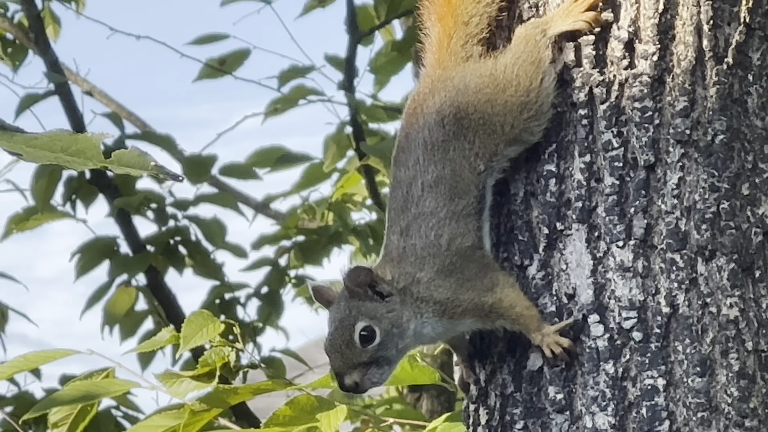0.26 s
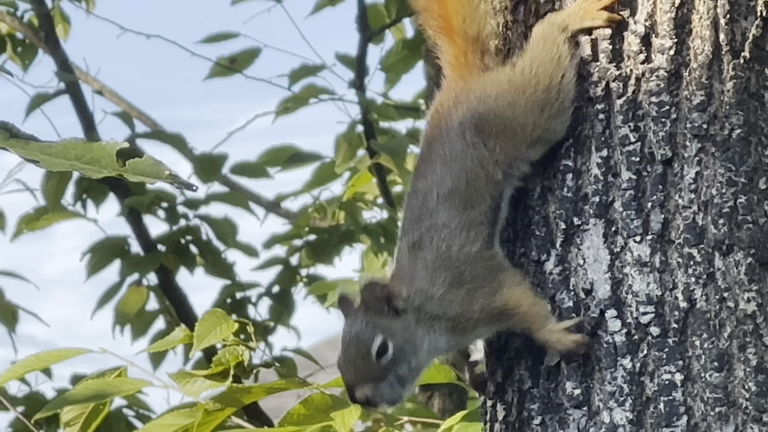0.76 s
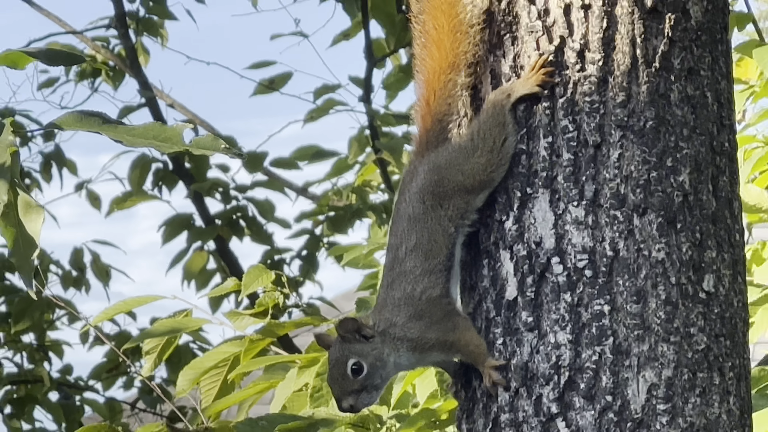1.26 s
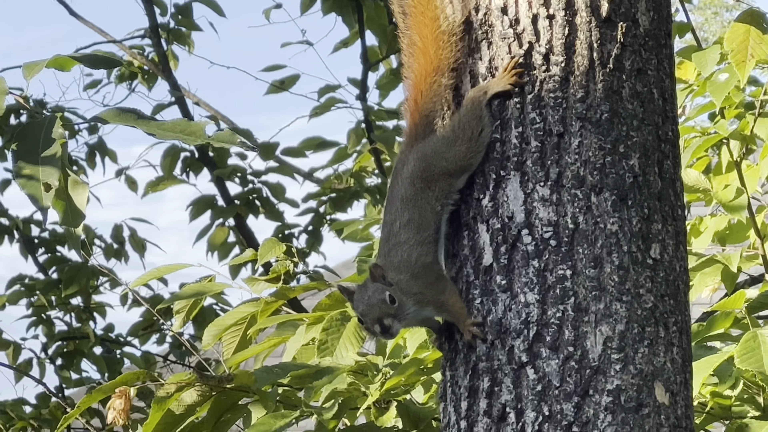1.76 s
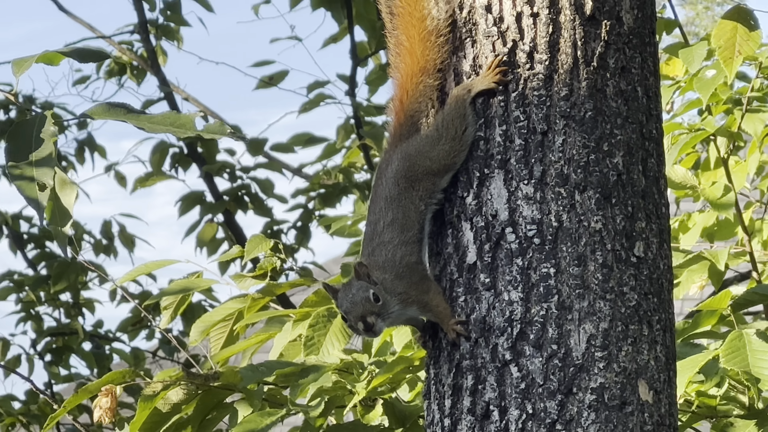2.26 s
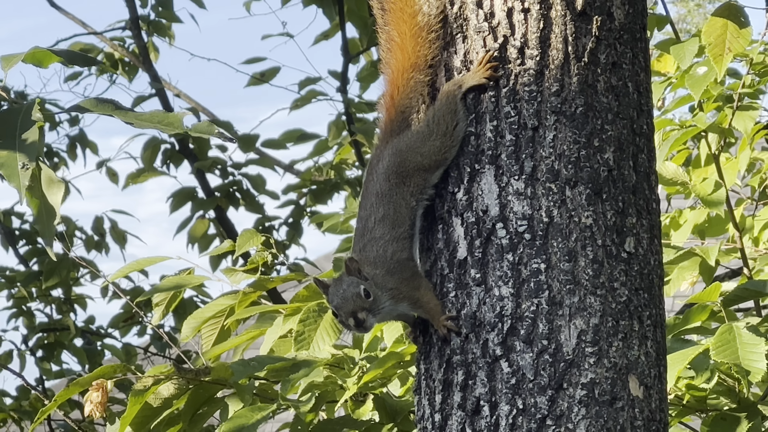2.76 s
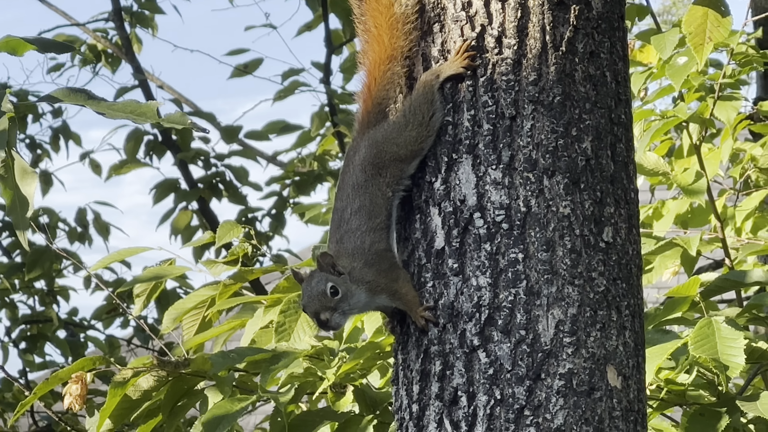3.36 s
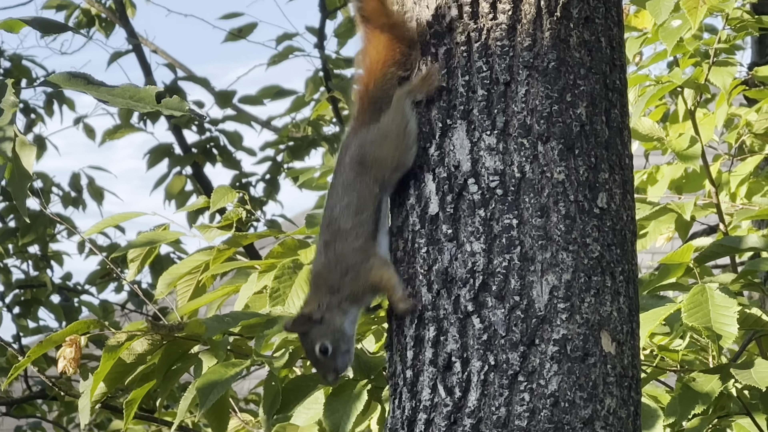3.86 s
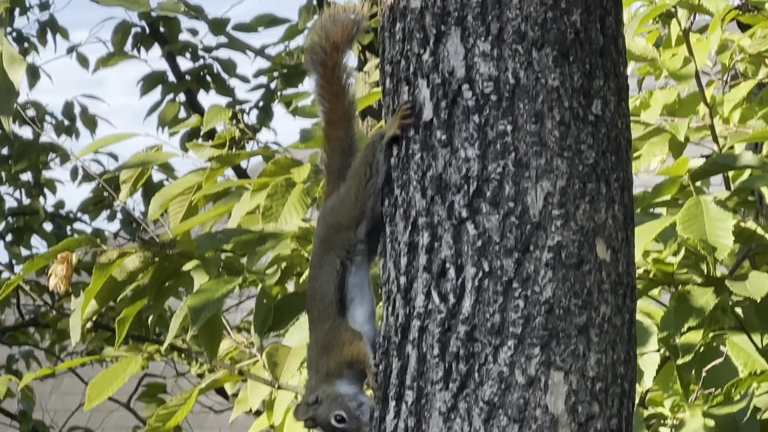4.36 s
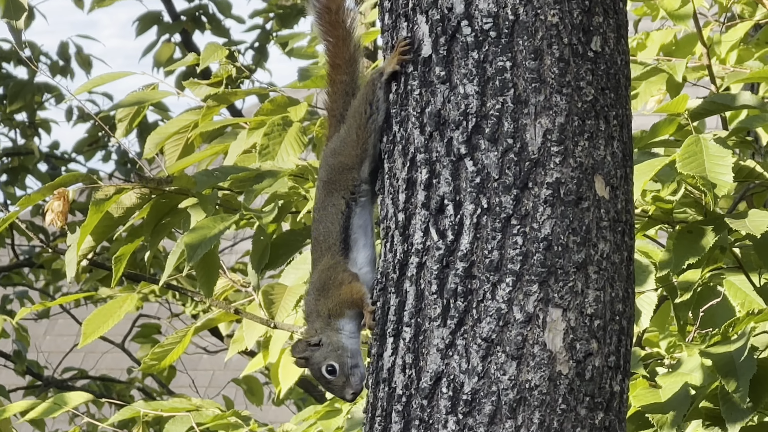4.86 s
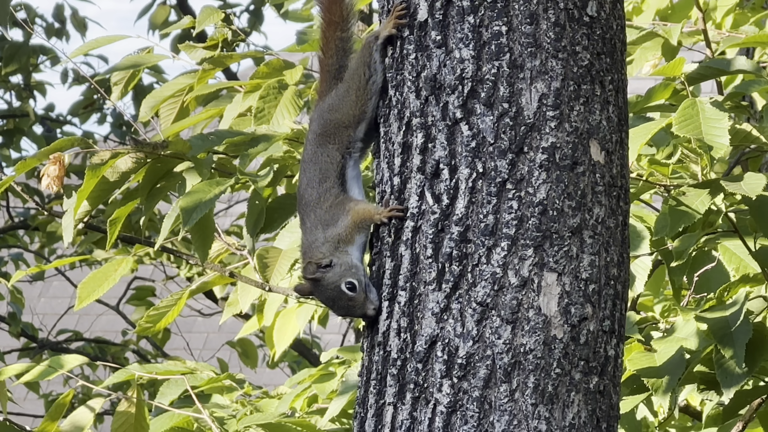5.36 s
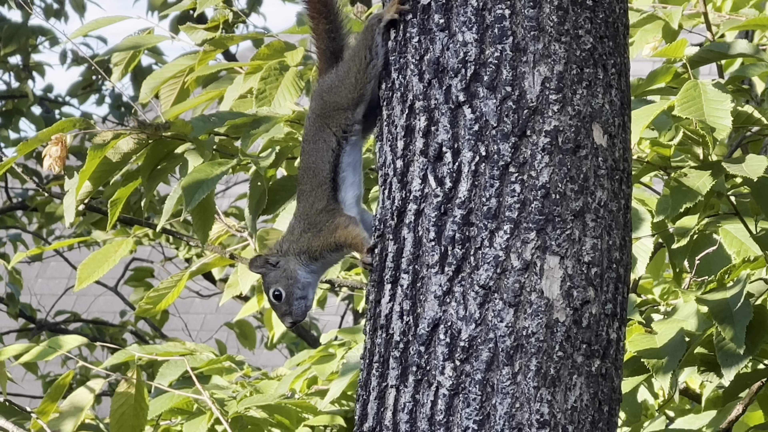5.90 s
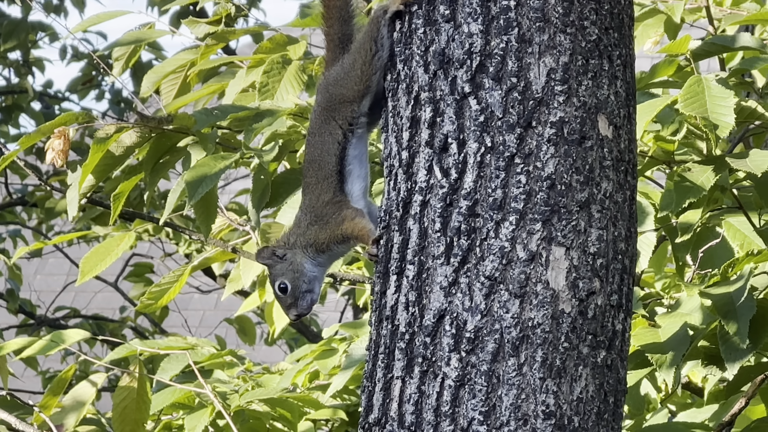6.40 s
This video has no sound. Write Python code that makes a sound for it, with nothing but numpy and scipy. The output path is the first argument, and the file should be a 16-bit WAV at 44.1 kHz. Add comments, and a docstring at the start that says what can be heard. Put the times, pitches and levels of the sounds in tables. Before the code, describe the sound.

Outdoors among trees, a phone microphone picks up steady low town rumble, a droning far engine and a soft high hum of cicadas. After a few quick finger taps on the phone, a nearby squirrel starts barking in sharp, squeaky chirps and keeps on at uneven intervals throughout. Faint insect buzzes, cricket chirps and short rustles sit behind it, and two distant birds whistle, most clearly toward the end.

```python
"""Town rumble, a droning engine and a chorus of clicking cicadas, with a few finger taps on a phone.
Then a squirrel on a trunk a few metres off gives short whistled barks that ring among the leaves.
Behind it are brief rustles; single insects buzz, a cricket rubs its wings and two far birds
whistle. The level dips briefly once. The phone spreads it all over two channels."""
import sys
import numpy as np
from scipy import signal
from scipy.fft import rfft, irfft
from scipy.io import wavfile
from scipy.ndimage import uniform_filter1d

SR = 44100
rng = np.random.default_rng(int(sys.argv[2]) if len(sys.argv) > 2 else 0)


def materialize(psi):
    """Save the field psi as 16-bit PCM at rate SR to the path in sys.argv[1].

    A 1-D psi becomes a single channel; in a 2-D psi each row is a channel.
    """
    bounded = np.clip(np.atleast_2d(psi).T, -1, 1)
    quanta = np.round(bounded * 32767).astype(np.int16)
    wavfile.write(sys.argv[1], SR, quanta)


N = 292603


def undb(db):
    """Gain of a level in dB."""
    return 10 ** (np.asarray(db) / 20)


def unit(x):
    """Scale to rms 1."""
    return x / np.sqrt(np.mean(x ** 2))


def add(out, start_s, piece):
    """Mix a piece in."""
    i = int(start_s * SR)
    out[i:i + len(piece)] += piece[:N - i]


def band(x, hz, width_hz):
    """Steep band-pass."""
    edges = np.clip([hz - width_hz / 2, hz + width_hz / 2], 100, .45 * SR)
    return signal.sosfilt(signal.butter(5, edges, "bandpass", fs=SR, output="sos"), x)


def ring(x, hz, width_hz):
    """Steep resonance: one peak filter applied twice."""
    b, a = signal.iirpeak(hz, hz / width_hz / 1.55, fs=SR)
    return signal.lfilter(b, a, signal.lfilter(b, a, x))


def over_hz(table, column=1, size=2 * N):
    """A table column at every FFT bin, interpolated over log frequency."""
    rows = np.array(table)
    bin_hz = np.arange(size // 2 + 1) * SR / size
    return np.interp(np.log(bin_hz + 1), np.log(rows[:, 0]), rows[:, column])


def wander(rate_hz):
    """Random steps, smoothed twice; rms 1."""
    hold = int(SR / rate_hz)
    steps = np.repeat(rng.standard_normal(N // hold + 1), hold)
    return unit(uniform_filter1d(uniform_filter1d(steps, hold), hold)[:N])


def clicks(samples, per_s, scatter_db):
    """Randomly timed clicks of uneven size."""
    hits = (rng.random(samples) < per_s / SR) * rng.choice([-1, 1], samples)
    return hits * undb(scatter_db * rng.standard_normal(samples))


def swell(rise_s, fall_s):
    """Rounded rise and fall."""
    ramp = np.r_[np.linspace(0, 1, int(rise_s * SR)), np.linspace(1, 0, int(fall_s * SR))]
    return np.sin(ramp * np.pi / 2) ** 2


def bursts(rows, rise_share, clicks_per_s, scatter_db, peak_share):
    """Swells of dense clicks in one band, strongest at its middle."""
    out = np.zeros(N)
    for start_s, length_s, hz, width_hz, db in rows:
        shape = swell(rise_share * length_s, (1 - rise_share) * length_s)
        grains = clicks(int(.5 * SR), clicks_per_s, scatter_db)[:len(shape)]
        peaked = ring(grains, hz, peak_share * width_hz)
        add(out, start_s, undb(db) * shape * unit(band(peaked, hz, width_hz)))
    return out


def echo(decays, dulling_per_s):
    """Scattered reflections dying away; total energy 1."""
    t = np.arange(int(.8 * SR)) / SR
    shape = sum(undb(db - 60 * t / t60_s) for t60_s, db in decays) * np.minimum(t / .003, 1)
    noise = rng.standard_normal(len(t))
    dull = unit(band(noise, 4540, 9900))
    tail = shape * (dull + (noise - dull) * np.exp(-dulling_per_s * t))
    return tail / np.sqrt(np.sum(tail ** 2))


# Town rumble and leaf hiss. Each row: frequency in Hz, density in dB per Hz.
TOWN_SPECTRUM = [(22, -95), (35, -87), (55, -63.5), (110, -71), (200, -81), (400, -87), (800, -91),
                 (1500, -102), (1800, -105), (2200, -116), (3000, -118), (5600, -122), (7300, -126),
                 (8700, -123), (10500, -132), (13800, -133), (14800, -145)]
# Each row: frequency in Hz, left-right coherence from 0 to 1.
TOWN_COHERENCE = [(30, 0.93), (60, 1), (200, 0.95), (400, 0.61), (700, 0), (1600, 1), (2200, .9), (9000, 1),
                  (15000, 0.2)]


def town():
    """Noise from all around; alike left and right in bass and treble, unrelated between."""
    alike = np.clip(over_hz(TOWN_COHERENCE, size=N), 0, 1)
    gain = undb(over_hz(TOWN_SPECTRUM, size=N)) * np.sqrt(SR / 4)
    mid, side = (rfft(rng.standard_normal(N)) * gain for _ in range(2))
    stereo = np.sqrt(1 + alike) * mid + np.sqrt(1 - alike) * side * np.array([[1], [-1]])
    return irfft(stereo, N) * undb(1.3 * wander(1.5))


def engine(hz=78.47, waver_hz=1.354, db=-44.5):
    """A far drone, wavering in pitch and strength."""
    phase = 2 * np.pi * np.cumsum(hz + waver_hz * wander(8)) / SR
    return undb(db + 1.5 * wander(12)) * np.sqrt(2) * np.sin(phase)


# Membrane resonances. Each row: centre in Hz, width in Hz, relative level in dB.
MEMBRANE_MODES = [(4275, 700, 2.5), (4707, 400, 1), (4994, 420, -2), (3284, 470, -10.5)]


def cicadas(db=-71):
    """Thousands of far membrane clicks a second blur into a slightly throbbing band."""
    crowd = clicks(N, per_s=5500, scatter_db=4.4) * undb(.78 * wander(69) + .39 * wander(3.2))
    chorus = sum(undb(mode_db) * band(ring(crowd, hz, width_hz), hz, 1.25 * width_hz)
                 for hz, width_hz, mode_db in MEMBRANE_MODES)
    return undb(db) * unit(chorus)


# Each row: start in seconds, nominal length in seconds, level in dB.
CRICKET_CHIRPS = [(.45, .125, -79), (2.595, .13, -79), (3.725, .085, -77)]
# Wing resonances. Each row: centre in Hz, width in Hz, relative level in dB.
WING_MODES = [(6520, 180, 2), (6860, 170, 5)]


def cricket(strokes_per_s=60):
    """Wing strokes scrape two close modes."""
    out = np.zeros(N)
    for start_s, length_s, db in CRICKET_CHIRPS:
        shape = swell(.3 * length_s, .8 * length_s) ** .5
        t = np.arange(len(shape)) / SR
        strokes = (.6 + np.sin(np.pi * strokes_per_s * t) ** 2) * rng.standard_normal(len(t))
        wings = sum(undb(mode_db) * ring(strokes, hz, width_hz) for hz, width_hz, mode_db in WING_MODES)
        add(out, start_s, undb(db) * shape * unit(wings))
    return out


# Each row: start in seconds, length in seconds, level in dB.
INSECT_BUZZES = [(1.05, 0.19, -68.5), (1.4, 0.32, -71), (2.969, 0.23, -67.5), (4.045, 0.35, -68),
                 (4.4, .23, -77), (5.044, 0.34, -68), (5.64, 0.38, -68.5), (6.277, 0.28, -69)]


def buzzes(hz=8100, width_hz=1930):
    """Single insects: high swells of rapid clicks."""
    rows = [(start_s, length_s, hz, width_hz, db) for start_s, length_s, db in INSECT_BUZZES]
    return bursts(rows, rise_share=.25, clicks_per_s=1500, scatter_db=2.1, peak_share=.41)


# Each row: start in seconds, opening pitch in Hz, level in dB.
HIGH_BIRD_NOTES = [(2.986, 1677, -61.5), (3.045, 1806, -57), (3.117, 1837, -56), (3.164, 1770, -57.5),
                   (3.221, 1713, -65.5), (3.28, 1805, -62.5), (3.38, 1790, -72), (5.547, 1770, -43),
                   (5.61, 1752, -45.5), (5.685, 1706, -68), (5.808, 1872, -46.5), (5.866, 1770, -47),
                   (5.94, 1680, -57), (6.02, 1833, -67)]
# Each row: start in seconds, nominal length in seconds, level in dB.
LOW_BIRD_NOTES = [(5.195, 0.14, -66.5), (5.647, 0.25, -63), (6.578, .07, -64.5)]


def birds(note_s=.05, fall_share=.05, low_hz=1334, t60_s=.83, echo_db=-.5):
    """Far, hoarse whistles smeared by echoes; one bird's notes fall, the lower one's hold."""
    out, waver = np.zeros(N), 1 + .022 * wander(120)
    notes = [(start_s, note_s, hz, hz * (1 - fall_share), db) for start_s, hz, db in HIGH_BIRD_NOTES]
    notes += [(start_s, length_s, low_hz, low_hz, db) for start_s, length_s, db in LOW_BIRD_NOTES]
    for start_s, length_s, first_hz, last_hz, db in notes:
        shape = swell(.25 * length_s, .9 * length_s) ** .5
        hz = np.geomspace(first_hz, last_hz, len(shape))
        hz *= np.resize(waver[int(start_s * SR):], len(shape))
        add(out, start_s, undb(db) * shape * np.sin(2 * np.pi * np.cumsum(hz) / SR))
    tails = [signal.fftconvolve(out, echo([(t60_s, 0)], dulling_per_s=0))[:N] for _ in range(2)]
    return out + undb(echo_db) * np.array(tails)


# Each row: start in seconds, length in seconds, centre in Hz, width in Hz, level in dB.
RUSTLES = [(1.06, 0.27, 6000, 5040, -66), (2.98, .11, 14300, 3200, -73), (3.035, .05, 2800, 2500, -60),
           (3.945, 0.023, 10400, 10900, -65), (3.965, .058, 9000, 8900, -71.5),
           (4.36, 0.18, 5600, 7200, -58.5), (5.548, 0.054, 8600, 4020, -64), (5.73, 0.25, 1205, 1630, -58)]


def rustles():
    """Brief rustles, a very high hiss and a low whoosh, made of fine clicks."""
    return bursts(RUSTLES, rise_share=.13, clicks_per_s=9000, scatter_db=1.3, peak_share=.76)


# Each row: start in seconds, pitch in Hz, T60 in seconds, level in dB, relative tick gain in dB.
FINGER_TAPS = [(0.2578, 1140, 0.011, -44, -40), (0.278, 1370, 0.0042, -36, -27),
               (0.299, 2340, 0.0018, -33.5, -19), (0.334, 550, 0.011, -33, -38)]


def taps():
    """Fingers knock on the phone's case, each with a faint tick."""
    out, t = np.zeros(N), np.arange(800) / SR
    for start_s, hz, t60_s, db, tick_db in FINGER_TAPS:
        knock = np.sin(2 * np.pi * hz * t) * undb(-60 * t / t60_s)
        tick = undb(tick_db - 60 * t / .004) * band(rng.standard_normal(len(t)), 5500, 8000)
        add(out, start_s, undb(db) * (knock + tick))
    return out


# Opening glide. Each row: share of the glide, base pitch as share of the top, gain in dB.
BARK_OPEN = [(0, 0.511, -30), (0.452, .6, 4.5), (0.849, .72, 4.5)]
# Held part. Each row: share of the time after the glide, unscaled pitch drop, gain in dB.
BARK_ARCH = [(0, .05, -6), (.18, .02, -2), (.45, 0, 0), (.63, .018, -1), (.78, .06, -3)]
# Falling end. Each row: share of the time after the glide, pitch as share of the top, gain in dB.
BARK_CLOSE = [(0.861, .74, 0.5), (.94, 0.451, -5.5), (1, 0.74, -5.5)]


def bark_contour(t, glide_s, length_s, top_hz, open_db, close_db):
    """Pitch share and envelope of a bark: glide, jump up, arch, fall."""
    open_at, open_pitch, open_gain_db = np.transpose(BARK_OPEN)
    arch_at, arch_drop, arch_gain_db = np.transpose(BARK_ARCH)
    close_at, close_pitch, close_gain_db = np.transpose(BARK_CLOSE)
    knots_s = np.r_[glide_s * open_at, glide_s + (length_s - glide_s) * np.r_[arch_at, close_at]]
    # High barks climb first and arch deeper; low ones only sag. Longer glides start lower.
    offset_khz = (top_hz - 5200) / 1000
    climb = np.where(arch_at < .45, np.clip(.6 + 1.8 * offset_khz, 0, 2), 1)
    depth = 1.24 + 1.17 * offset_khz
    open_drop = 28 * (glide_s - .005) * (1 - open_at)
    pitches = np.r_[open_pitch - open_drop, 1 - depth * climb * arch_drop, close_pitch]
    bend = uniform_filter1d(np.interp(t, knots_s, pitches), size=24, mode="nearest")
    gains_db = np.r_[open_db + open_gain_db, arch_gain_db, close_db + close_gain_db]
    fade = np.clip(np.minimum(t, length_s - t) / .0015, 0, 1)
    return bend, undb(np.interp(t, knots_s, gains_db)) * fade


def bark(glide_s, length_s, top_hz, second_db, third_db, open_db, close_db):
    """Vocal folds give a fluttering whistle with two overtones; a rough lower voice beats with it."""
    t = np.arange(int(length_s * SR)) / SR
    bend, envelope = bark_contour(t, glide_s, length_s, top_hz, open_db, close_db)
    phase = 2 * np.pi * np.cumsum(top_hz * bend) / SR
    taut = np.clip((bend - .85) / .09, 0, 1) ** 2  # folds at full tension
    slack = np.clip((.76 - bend) / .017, 0, 1) * (t < glide_s)  # loose folds, rich in overtones
    noise = rng.standard_normal((5, 4000))
    rasp_db = -28 + 530 * (length_s - .04)  # longer barks rasp more
    rasp_hz = 2560 - 42.5 * second_db
    rasp = undb(rasp_db) * taut * unit(ring(noise[0], rasp_hz, 300))[-len(t):]
    flutter = [undb(3.5 * t / length_s * unit(ring(row, 220, 260))[-len(t):]) for row in noise[1:4]]
    turbulence = undb(-30.5) * unit(band(noise[4], 1700, 2400))[-len(t):]
    voice = flutter[0] * np.sin(phase) * (1 + .34 * rasp) + rasp
    voice += (taut * undb(second_db) * flutter[1] + slack * undb(-11)) * np.sin(2 * phase)
    voice += (taut * undb(third_db) * flutter[2] + slack * undb(-24.5)) * np.sin(3 * phase)
    return np.sqrt(2) * envelope * voice * (1 + turbulence)


# Tree crown echo. Each row: T60 in seconds, relative level in dB.
CROWN_DECAYS = [(.1, -3.5), (.35, -9)]
# Mouth filter. Each row: frequency in Hz, gain in dB.
MOUTH_RESPONSE = [(1800, -20), (2600, -10), (5200, -2), (6200, -10), (7800, -3.5), (9500, 6.5),
                  (10700, -8.5), (11800, -8.5), (13200, -8), (15200, -2.5), (16300, -4)]
# Each row: start, opening glide and length in seconds, top pitch in Hz, level in dB before the mouth
# filter, then relative gains in dB of 2nd harmonic, 3rd harmonic, opening, close and echo.
# The bark inside the level dip is heard almost only as its echo.
SQUIRREL_BARKS = [(0.754, 0.0072, 0.053, 5480, -29, -4, -15, -37, -12, -3),
                  (1.29, 0.0048, 0.042, 5200, -33.5, -6.5, -8.5, -12, -10, -4),
                  (1.637, 0.0082, 0.033, 4904, -36, -6.5, -10, -17.5, -8.5, -6),
                  (2.112, 0.0054, 0.037, 4915, -30.5, -13, -16.5, -7.5, -12.5, -5.5),
                  (2.908, 0.0051, 0.039, 4960, -31, -13, -18, -6.5, -9.5, -4),
                  (3.075, 0.006, 0.023, 4930, -63.5, -12, -16, -2, -21, 26),
                  (3.340, 0.0063, .037, 4870, -32.5, -12.5, -16, 2, -11, -5),
                  (3.819, 0.0046, 0.045, 5200, -30.5, -9, -9, -12.5, -9, -7.5),
                  (4.178, 0.0039, 0.034, 5224, -33.5, -13, -20, -10, -12, -2),
                  (4.372, 0.013, 0.038, 5236, -30.5, -13, -51, -14, -2.5, -6.5),
                  (4.662, 0.0044, 0.036, 5088, -28.5, -19, -23, -22, -24, -2.5),
                  (4.99, 0.0038, 0.039, 5036, -25.5, -16.5, -21.5, -28, -7.5, -9),
                  (5.479, 0.0056, 0.041, 5370, -21.5, -12.5, -28, -35, -14.5, -8),
                  (6.26, 0.01, 0.047, 5443, -29.5, -1.5, -25, -21.5, -10, -4),
                  (6.618, 0.0047, 0.033, 5340, -33, -2.5, -24, -10, -8, -1)]


def squirrel():
    """Barks, coloured by the mouth and scattered by the tree crown."""
    # Leaves are too small to throw back the lower tones.
    highpass = signal.butter(3, 4400, "highpass", fs=SR, output="sos")
    crown = signal.sosfilt(highpass, echo(CROWN_DECAYS, dulling_per_s=11.4))
    out = np.zeros(N)
    for start_s, glide_s, length_s, top_hz, db, *part_gains_db, echo_db in SQUIRREL_BARKS:
        voice = undb(db) * bark(glide_s, length_s, top_hz, *part_gains_db)
        add(out, start_s, voice)
        add(out, start_s, undb(echo_db) * signal.fftconvolve(voice, crown))
    return irfft(rfft(out, 2 * N) * undb(over_hz(MOUTH_RESPONSE)))[:N]


# Each row: time in seconds, overall gain from 0 to 1.
LEVEL_DIP = [(3.057, 0.98), (3.093, 0), (3.131, 0.94)]


def scene():
    """All sources, with one brief dip in level."""
    insects = cicadas() + cricket() + buzzes()
    near = squirrel() + rustles() + taps()
    dip = np.interp(np.arange(N) / SR, *np.transpose(LEVEL_DIP))
    return dip * (near + insects + birds() + engine() + town())


# Each row: frequency in Hz, phase lead of right in radians, left minus right in dB.
PHONE_SPREAD = [(300, 0, -.5), (1000, -.3, -1.5), (1750, -1.5, -4), (2250, -.45, 0), (6600, -.4, 0),
                (7900, -5.3, 0), (8600, -6, 0), (10800, -3.4, 0), (12300, -3.1, 0), (13200, 0, 0),
                (14600, .1, 0), (16200, 1.6, 0)]


def record(dry, top_hz=16100):
    """The phone offsets the channels' phase and level by band and cuts the top."""
    right = np.exp(.5j * over_hz(PHONE_SPREAD)) * undb(-over_hz(PHONE_SPREAD, column=2) / 2)
    wide = irfft(rfft(dry, 2 * N) * np.array([1 / right, right]))[:, :N]
    return signal.sosfilt(signal.ellip(8, .2, 70, top_hz, fs=SR, output="sos"), wide)


dry = scene()
out = record(dry)
materialize(out)
```